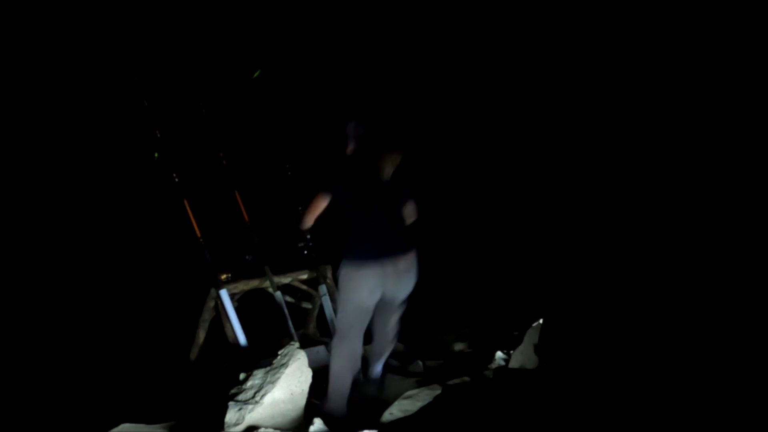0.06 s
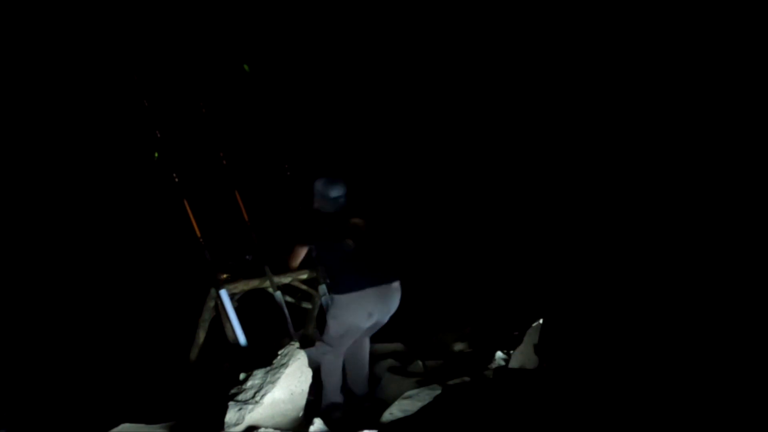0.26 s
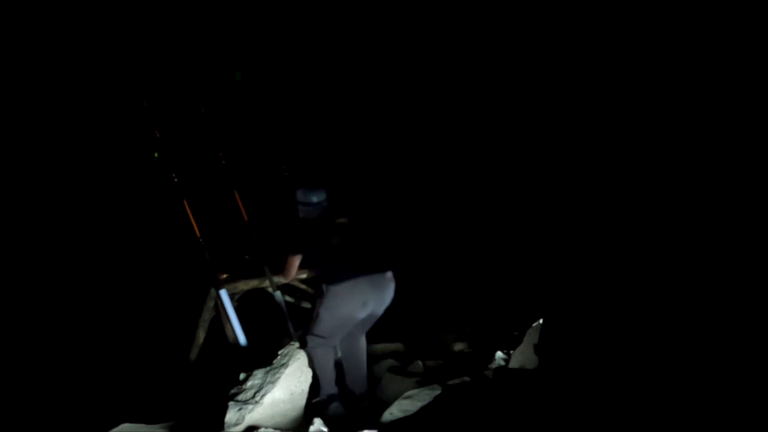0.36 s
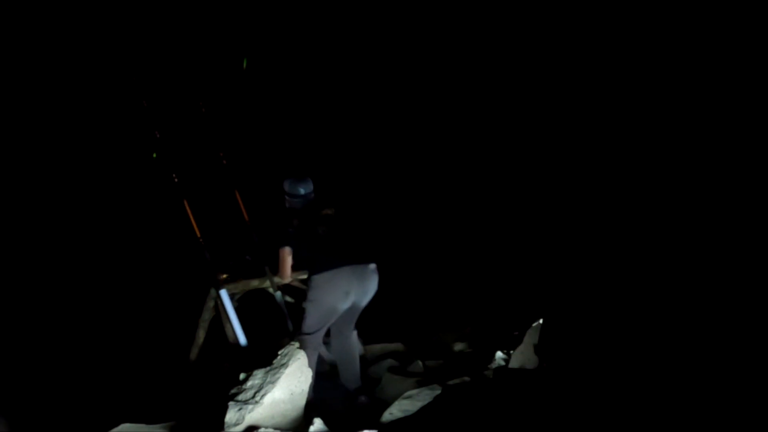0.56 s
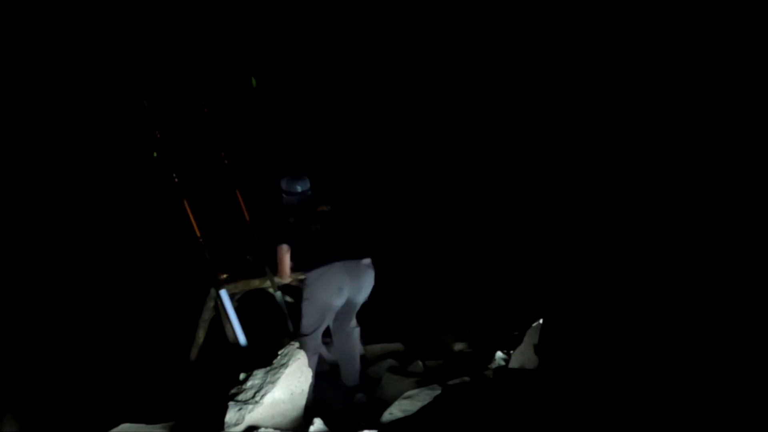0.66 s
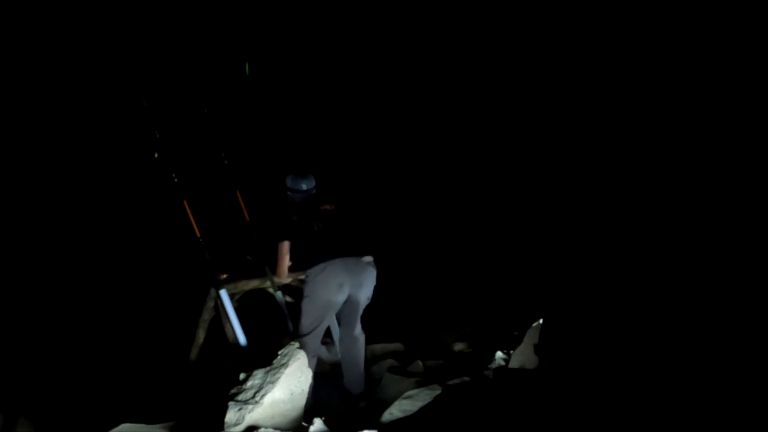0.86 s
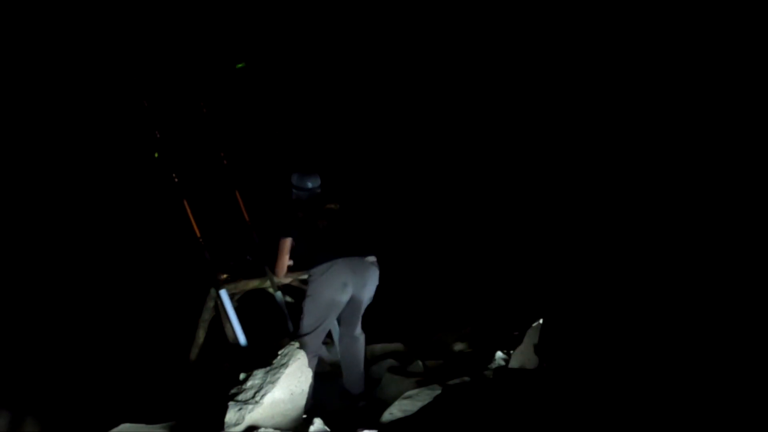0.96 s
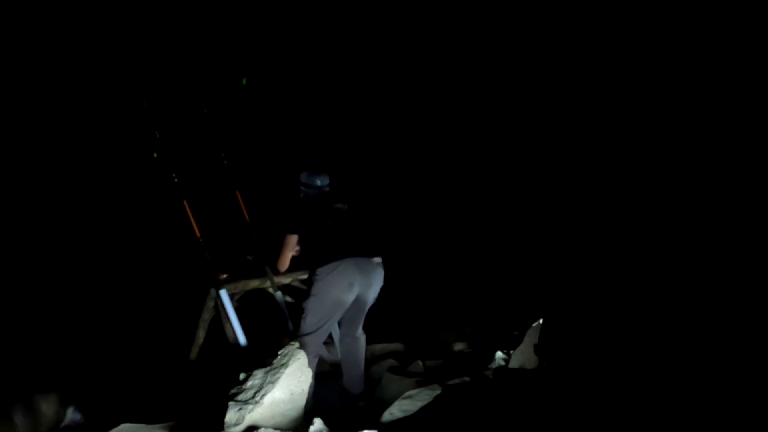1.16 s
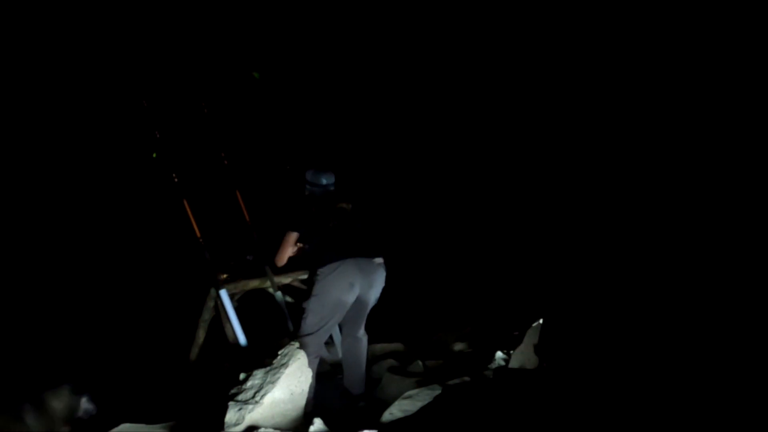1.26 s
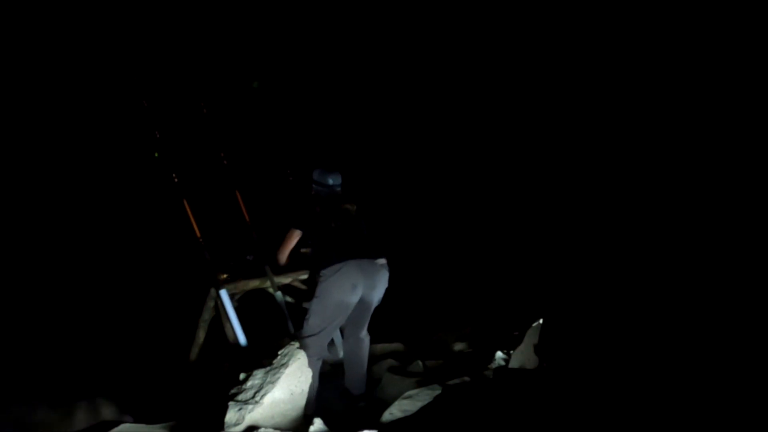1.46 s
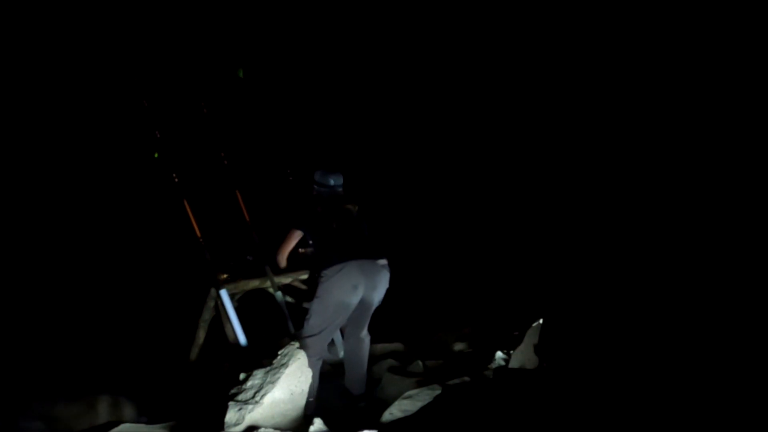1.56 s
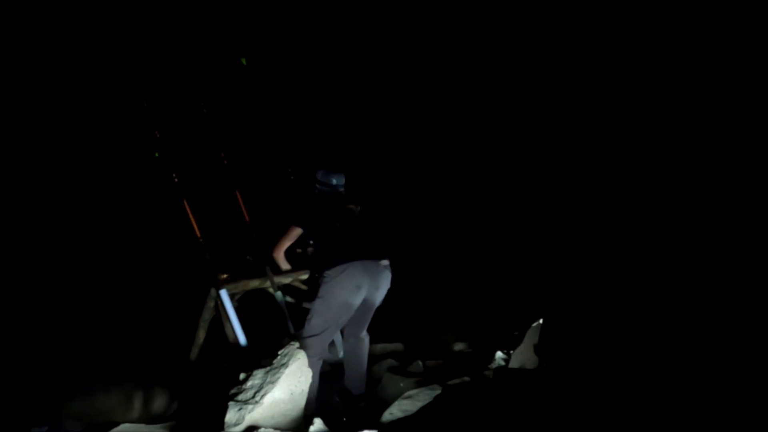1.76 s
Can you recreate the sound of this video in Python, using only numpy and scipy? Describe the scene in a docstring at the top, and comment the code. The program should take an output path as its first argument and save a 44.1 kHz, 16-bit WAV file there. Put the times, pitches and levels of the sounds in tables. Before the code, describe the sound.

Two quick, hollow knocks on rock follow the scuff and dull thud of a footstep on a lake shore. Around them, quiet little waves splash, drip and glug between the stones over faint low sloshing.

```python
"""A loose, hollow-sounding piece (wood or a slab) knocks twice on the rocks, each strike ringing its modes.
Someone is stepping down onto a lake shore at night, with a gritty scuff and a dull thud.
Around the step, small waves splash and tick on the stones and glug as air rings in the gaps between them.
Underneath lies a bed of low sloshing and the far hush of open water."""
import sys
import numpy as np
from scipy import signal
from scipy.fft import rfft, irfft
from scipy.io import wavfile

SR = 44100
rng = np.random.default_rng(int(sys.argv[2]) if len(sys.argv) > 2 else 0)


def waveform_to_disk(signal):
    """Save audio, clipped to [-1, 1], as 16-bit WAV at the path in sys.argv[1]."""
    frames = np.transpose(np.atleast_2d(signal))
    scaled = np.clip(frames, -1, 1) * 32767
    samples = np.round(scaled).astype(np.int16)
    wavfile.write(sys.argv[1], SR, samples)


N = 79380
TIME = np.arange(N) / SR

# stereo image of the noise layers: (frequency [Hz], side level [dB], left over right [dB])
STEREO_IMAGE = [(300, -11.5, -1), (1120, -14.5, -2.5), (4160, -9, 2), (8630, 2, 0), (14000, 9, -6.5)]
# tone of the open lake's hush: (frequency [Hz], level [dB])
HUSH_EQ = [(30, -11.5), (90, -19.5), (190, -19.5), (750, -21), (1100, -9), (2400, -7), (3800, -13),
           (7000, -23), (11500, -37), (15000, -51.5)]
# tone of the low sloshing: (frequency [Hz], level [dB])
SLOSH_EQ = [(25, -0.5), (50, -1.5), (95, -17.5), (170, 3), (300, -5.5), (500, -9.5), (800, -25),
            (4000, -71)]
# fader ride of the trickle between splashes: (time [s], level [dB])
TRICKLE_RIDE = [(0, -57.5), (.1, -56.5), (.45, -56), (.6, -62.5), (.69, -70.5), (.85, -57.5), (1.05, -58.5),
                (1.3, -56), (1.42, -75.5), (1.57, -54.5), (1.7, -61.5), (1.8, -54.5)]
# tone of spray and trickle: (frequency [Hz], level [dB])
SPRAY_EQ = [(700, -26.5), (1040, -0.5), (1600, -1.5), (2600, -4.5), (3700, -2), (5000, -9), (7500, -15.5),
            (11000, -36), (15000, -41)]
# small splashes on the stones: (time [s], level [dB], t60 [s], pitch of the hollow they ring [Hz])
SPLASH_HITS = [(0.007, -42.5, 0.046, 1734), (0.016, -45.5, 0.077, 3270), (0.03, -49, 0.089, 3860),
               (0.058, -42.5, 0.034, 3840), (0.109, -45, 0.045, 5140), (0.549, -49, 0.05, 3700),
               (0.564, -47.5, 0.032, 3260), (0.629, -49.5, 0.057, 6000), (0.704, -50, .04, 1120),
               (0.778, -56, 0.068, 1630), (0.799, -50, 0.15, 1440), (0.82, -51, 0.036, 3350),
               (0.929, -48, 0.077, 1210), (0.983, -44.5, 0.054, 3400), (1.005, -47, 0.049, 3460),
               (1.026, -51, 0.082, 1260), (1.104, -49, 0.16, 1063), (1.137, -47, 0.043, 4960),
               (1.165, -55, 0.017, 3670), (1.19, -51, 0.072, 1080), (1.249, -48, 0.12, 1000),
               (1.279, -44, 0.064, 3350), (1.303, -44, 0.069, 4870), (1.334, -47.5, 0.063, 2630),
               (1.482, -46.5, 0.031, 3740), (1.497, -45.5, 0.03, 3860), (1.638, -45, 0.069, 3480),
               (1.6452, -40.5, 0.074, 3500), (1.7326, -39.5, 0.053, 2950)]
# brief ring of the pebbles: (frequency [Hz], level [dB])
PEBBLE_MODES = [(1600, 4), (1920, -1), (2560, -1), (3110, 4), (3530, 12), (4450, 3), (4900, 3)]
# single sharp drips: (time [s], level [dB], left over right [dB])
DRIP_HITS = [(0.254, -30.5, 1), (0.734, -43.5, 5), (1.071, -41, 9), (1.165, -40, 3), (1.336, -35.5, 0),
             (1.6944, -38, -2), (1.787, -37.5, 1)]
# air pockets ringing between the rocks: (time [s], pitch [Hz], level [dB], attack [s], t60 [s])
AIR_POCKETS = [(0.02, 252, -52, 0.0028, 0.67), (0.089, 268, -34.5, 0.0019, 0.31),
               (0.143, 280, -32.5, 0.0017, 0.092), (0.235, 336.7, -26, 0.0032, 0.11),
               (0.283, 194.5, -14.5, 0.00095, 0.038), (0.302, 419, -28, 0.001, 0.079),
               (0.54, 300, -38, 0.0035, 0.018), (0.617, 165.5, -48.5, 0.0046, 0.17),
               (0.906, 297.5, -52, 0.0039, 0.22), (1.207, 135, -39.5, 0.0087, 0.032),
               (1.209, 264, -38.5, 0.0069, 0.069), (1.251, 182.7, -38, 0.028, 0.22),
               (1.564, 164.4, -33, 0.019, 0.11)]
# tone of grit under a sole: (frequency [Hz], level [dB])
GRIT_EQ = [(70, -10.5), (300, 6.5), (1000, 5.5), (2000, 0), (3000, -6), (4000, -2.5), (6000, -14.5),
           (10000, -28), (15000, -48.5)]
# contacts of sole and stone: (time [s], level [dB], t60 [s], low-pass [Hz])
SCUFF_HITS = [(0.175, -42, 0.3, 4500), (0.227, -42, 0.49, 2400), (0.266, -37, 0.079, 1150),
              (0.277, -31, 0.084, 5000), (0.285, -29, 0.039, 3650), (0.3809, -19, 0.041, 7430),
              (0.410, -30.5, 0.088, 5850), (0.43, -36.5, 0.039, 3010), (0.448, -35, 0.096, 6000)]
# tone of the thuds: (frequency [Hz], level [dB])
THUD_EQ = [(25, -14.5), (55, -9.5), (90, -2.5), (160, 12), (260, 7.5), (400, -4.5), (650, -13.5),
           (3500, -66)]
# dull thuds of feet and shifting stones: (time [s], level [dB], t60 [s])
THUD_HITS = [(0.175, -36, 0.47), (0.231, -48, 0.072), (0.278, -34.5, 0.18), (0.634, -51.5, 0.2),
             (0.704, -45, 0.15), (1.026, -45, 0.12), (1.599, -48, 0.24)]
# deep weight of the steps: (time [s], pitch [Hz], level [dB], attack [s], t60 [s])
WEIGHT_THUMPS = [(0.18, 56.5, -35, 0.0079, 0.051), (0.283, 56.4, -30.5, 0.0061, 0.12),
                 (1.028, 64, -44.5, 0.0145, 0.16), (1.211, 77, -52, 0.019, 0.063)]
# modes of the loose piece besides its main note: (frequency [Hz], level [dB], t60 [s])
BODY_MODES = [(332, -18, 0.07), (491.5, -7, 0.034), (693, -7, 0.092), (1190, -9, .055), (1684, -19, 0.09),
              (1868, -5, 0.075), (2010, -19, .06), (2556, -23.5, 0.043)]
# contacts that make up the two rattling knocks:
# (time [s], level [dB], low-pass [Hz], main note trim [dB], main note pitch [Hz], main note t60 [s])
KNOCK_HITS = [(0.37509, -16, 1750, -2, 955, .05), (0.38046, -13.5, 3200, -3, 965, .05),
              (0.39224, -19, 1400, 0, 940, .085), (0.4239, -17, 1300, 3, 945, .075),
              (0.42816, -31, 950, 11.5, 938, .07), (0.446, -44, 950, 6, 970, .1)]

HUSH_DB, SLOSH_DB, SLOSH_FOLLOW = -65, -59.5, 0.52  # follow: share of the trickle's swing in dB
DROPLETS_PER_S, DROPLET_SPREAD_DB, DROPLET_T60_CYCLES, DROPLET_TILT_DB_PER_OCTAVE = 700, 3, 24, 1
TRICKLE_NOISE_DB, TRICKLE_DROPLET_DB, CLUMPS_PER_S, CLUMP_DEPTH_DB = -6.5, -3, 80, 4
SPLASH_TRIM_DB, SPLASH_DROPLET_DB, SPRAY_LOW_CUT_HZ = -3, -9, 787
HOLLOW_Q, HOLLOW_DB, PEBBLE_Q, PEBBLE_SPREAD_DB = 14, 11, 55, 2.5
DRIP_HZ, DRIP_T60_S = 6770, 0.0014
MAIN_NOTE_DB, CHATTER_DB, ECHO_DB = 3.5, -39, -35
LEFT_LAG_S, PEAK_LIMIT, STOPBAND_HZ = 0.00003, 0.62, 15800


def from_db(db):
    """Decibels to gain."""
    return 10 ** (np.asarray(db) / 20)


def unit_rms(x):
    """Scale to rms 1."""
    return x / np.sqrt(np.mean(x ** 2) + 1e-20)


def eq_curve(points, column=1):
    """A table's column drawn across the spectrum on a log frequency axis."""
    points = np.array(points)
    return np.interp(np.log(np.fft.rfftfreq(N, 1 / SR) + 1), np.log(points[:, 0]), points[:, column])


def cut(x, hz, kind="low", order=2):
    """Low- or high-pass."""
    return signal.sosfilt(signal.butter(order, hz, kind, fs=SR, output="sos"), x + 1e-18)


def texture(eq, grain_db=0):
    """Stereo noise shaped by an EQ, rms 1; grain roughens it into tiny uneven impacts."""
    grains = from_db(grain_db * np.minimum(rng.exponential(1, N // 8 + 1), 5)).repeat(8)[:N]
    mid, side = rfft(rng.standard_normal((2, N)) * grains) * from_db(eq_curve(eq))
    sign = np.array([[1], [-1]])
    width = from_db(eq_curve(STEREO_IMAGE))
    balance = from_db(sign * eq_curve(STEREO_IMAGE, 2) / 2)
    return unit_rms(irfft((mid + sign * side * width) * balance, N))


def envelope(start, attack, t60):
    """A straight rise, then an exponential tail."""
    age = TIME - start
    return np.clip(age / attack, 0, 1) * from_db(-60 * np.clip((age - attack) / t60, 0, 3))


def click(start):
    """A unit impulse."""
    return np.maximum(0, 1 - np.abs(np.arange(N) - start * SR))


def ring(x, hz, t60):
    """One mode: a unit click sets a sine of height 1 ringing."""
    radius, angle = np.exp(-np.log(1000) / (t60 * SR)), 2 * np.pi * hz / SR
    return signal.lfilter([0, np.sin(angle)], [1, -2 * radius * np.cos(angle), radius ** 2], x + 1e-18)


def resonate(x, hz, q):
    """A resonance with unit gain at its peak."""
    return signal.lfilter(*signal.iirpeak(hz, q, fs=SR), x + 1e-18)


def tone(start, hz, db, attack, t60, glide=0):
    """A damped sine whose pitch glides by a share per second."""
    age = TIME - start
    phase = 2 * np.pi * hz * age * (1 + glide * age / 2)
    return from_db(db) * envelope(start, attack, t60) * np.sin(phase)


def pan(x, pan_db):
    """Place a mono source; positive is left."""
    return np.array([x * from_db(pan_db / 2), x * from_db(-pan_db / 2)])


def trickle_db():
    """How lively the water is over time."""
    return np.interp(TIME, *np.transpose(TRICKLE_RIDE))


def lake():
    """The bed: low sloshing swells with the trickle, over the far hush."""
    swell_db = trickle_db() - trickle_db().mean()
    slosh = from_db(SLOSH_DB + SLOSH_FOLLOW * swell_db) * texture(SLOSH_EQ)
    return slosh + from_db(HUSH_DB) * texture(HUSH_EQ)


def droplets(pitch_count=28):
    """Tiny bubbles burst at random, each with its own pitch, size and pan; rms 1."""
    pops = rng.random(N) < DROPLETS_PER_S / SR
    sizes = from_db(DROPLET_SPREAD_DB * np.minimum(rng.exponential(1, N), 4))
    polarity = rng.choice([-1, 1], N)
    pans = 1 + np.array([[1], [-1]]) * rng.standard_normal(N) / 2
    kicks = pops * sizes * polarity * pans
    pitch_index = rng.integers(0, pitch_count, N)
    fizz = 0
    for k, hz in enumerate(np.geomspace(1000, 11000, pitch_count)):
        db = np.interp(hz, *np.transpose(SPRAY_EQ)) + DROPLET_TILT_DB_PER_OCTAVE * np.log2(hz)
        fizz += from_db(db) * np.sqrt(hz) * ring(kicks * (pitch_index == k), hz, DROPLET_T60_CYCLES / hz)
    return unit_rms(fizz)


def trickle():
    """A thin run of water and bubbles rustles in little clumps."""
    water = from_db(TRICKLE_NOISE_DB) * texture(SPRAY_EQ) + from_db(TRICKLE_DROPLET_DB) * droplets()
    clumps = np.interp(TIME * CLUMPS_PER_S, np.arange(N), rng.standard_normal(N))
    return water * from_db(trickle_db() + CLUMP_DEPTH_DB * clumps)


def splashes():
    """Each burst of spray rings a hollow of its own and the pebbles, a little differently each time."""
    spray = texture(SPRAY_EQ, grain_db=3.5) + from_db(SPLASH_DROPLET_DB) * droplets()
    mix = 0
    for start, db, t60, hollow_hz in SPLASH_HITS:
        hit = spray * from_db(db + SPLASH_TRIM_DB) * envelope(start, attack=0.0012, t60=t60)
        mix += hit + from_db(HOLLOW_DB) * resonate(hit, hollow_hz, HOLLOW_Q)
        for hz, mode_db in PEBBLE_MODES:
            mix += from_db(mode_db + PEBBLE_SPREAD_DB * rng.standard_normal()) * resonate(hit, hz, PEBBLE_Q)
    return mix


def drips():
    """Lone drops tick on stone."""
    return sum(pan(ring(from_db(db) * click(start), DRIP_HZ, DRIP_T60_S), pan_db)
               for start, db, pan_db in DRIP_HITS)


def glugs():
    """Trapped air rings, dead centre; the pitch sags as the pocket changes shape."""
    return sum(tone(*pocket, glide=-0.24) for pocket in AIR_POCKETS)


def footsteps():
    """Grit crunches under each contact, the ground thuds, and shifting weight adds a deep thump."""
    grit = texture(GRIT_EQ, grain_db=2.5)
    scuffs = sum(cut(grit * from_db(db) * envelope(start, attack=0.002, t60=t60), hz, order=1)
                 for start, db, t60, hz in SCUFF_HITS)
    thud_gain = sum(from_db(db) * envelope(start, attack=0.008, t60=t60) for start, db, t60 in THUD_HITS)
    thumps = sum(tone(*thump) for thump in WEIGHT_THUMPS)
    return scuffs + thud_gain * texture(THUD_EQ) + thumps


def knocks():
    """Each strike and its chatter ring the loose piece; its main note shifts with how it rests."""
    body = 0
    for start, db, contact_hz, main_db, main_hz, main_t60 in KNOCK_HITS:
        chatter = rng.standard_normal(N) / 2 * envelope(start, attack=0.00067, t60=0.06)
        force = from_db(db) * cut(click(start) + from_db(CHATTER_DB) * chatter, contact_hz, order=1)
        body -= from_db(MAIN_NOTE_DB + main_db) * ring(force, main_hz, main_t60)
        for k, (hz, mode_db, t60) in enumerate(BODY_MODES):
            polarity = (-1) ** (k + (hz > main_hz))  # alternates up the modes, main note included
            body += polarity * from_db(mode_db) * ring(force, hz, t60)
    body = cut(body, hz=150, kind="high")  # keeps low rumble out of the knocks
    scatter = rng.standard_normal((2, N)) * envelope(0.0041, attack=0.005, t60=0.2)  # off the rocks
    echo = signal.fftconvolve(body[None], unit_rms(scatter) / np.sqrt(N), axes=1)[:, :N]
    return pan(body, pan_db=-3) + from_db(ECHO_DB) * echo


def scene():
    """The shore mix, with the left channel a hair late."""
    foreground = knocks() + footsteps()
    bright_water = cut(splashes() + trickle(), SPRAY_LOW_CUT_HZ, "high", order=4)
    left, right = foreground + glugs() + bright_water + drips() + lake()
    return np.array([np.interp(TIME - LEFT_LAG_S, TIME, left), right])


def record(dry):
    """Master chain: soft-clip the loudest peaks, then cut the top steeply."""
    rounded = PEAK_LIMIT * np.tanh(dry / PEAK_LIMIT)
    return signal.sosfilt(signal.cheby2(12, 70, STOPBAND_HZ, fs=SR, output="sos"), rounded)


dry = scene()
out = record(dry)
waveform_to_disk(out)
```